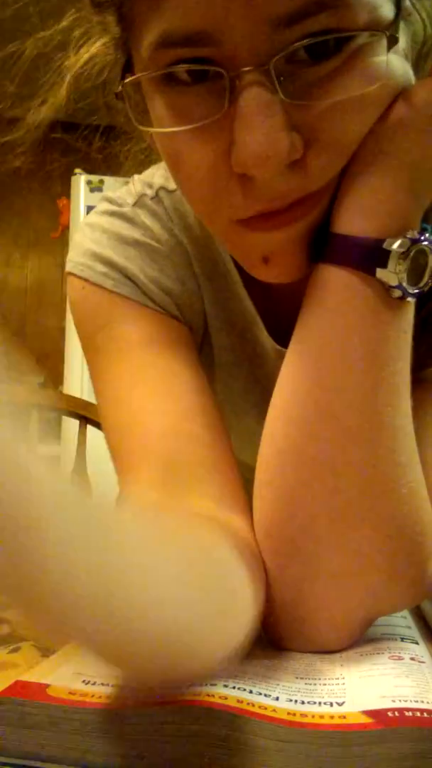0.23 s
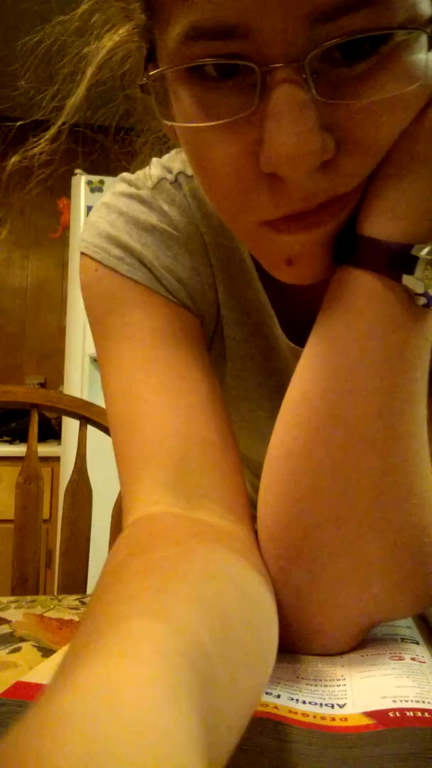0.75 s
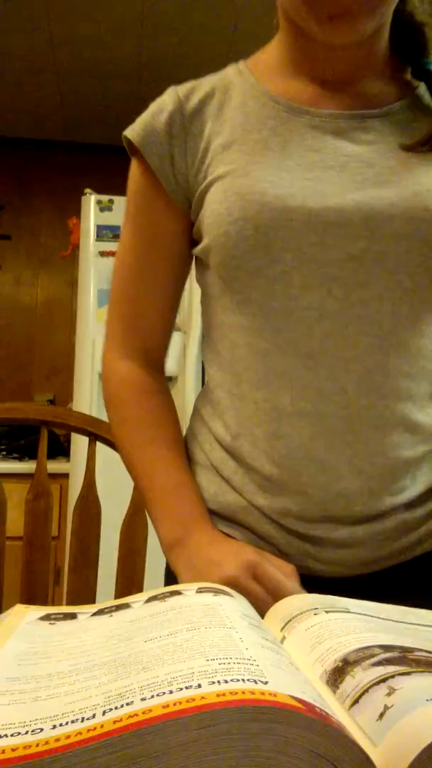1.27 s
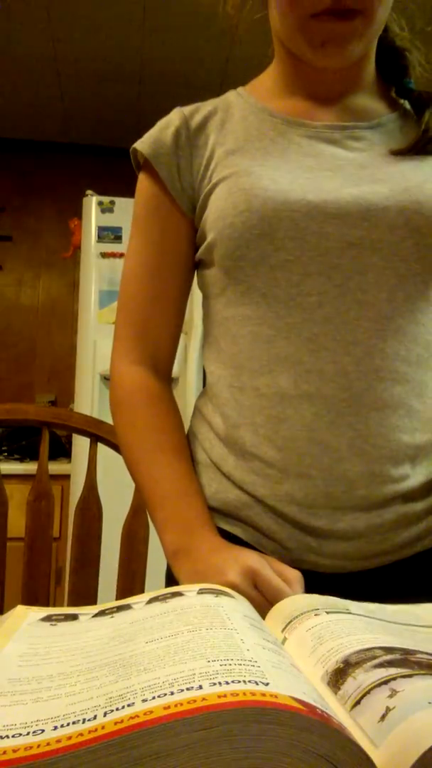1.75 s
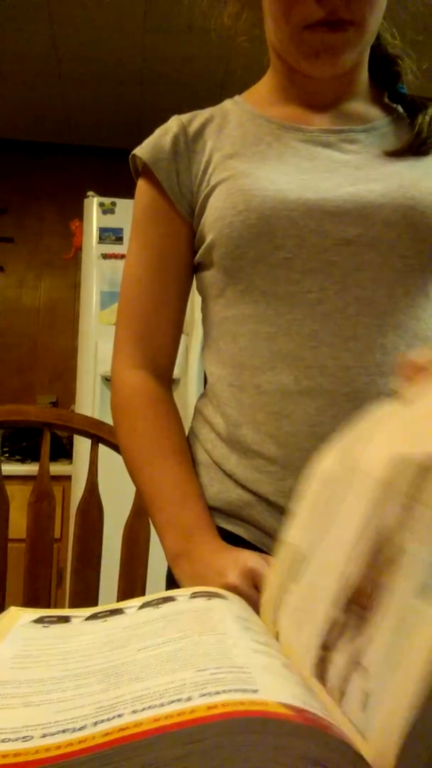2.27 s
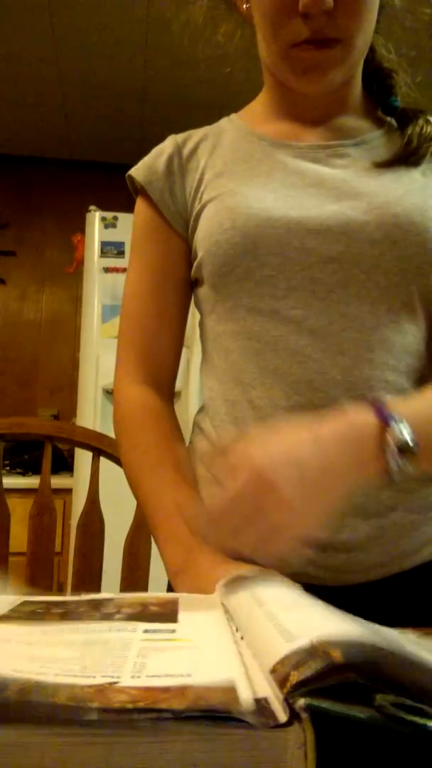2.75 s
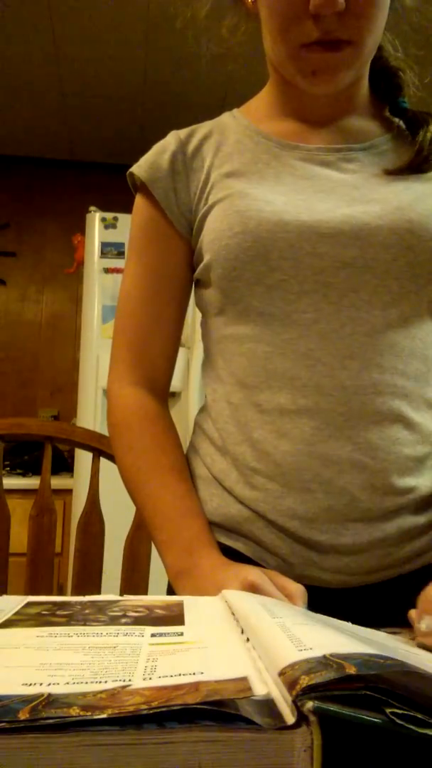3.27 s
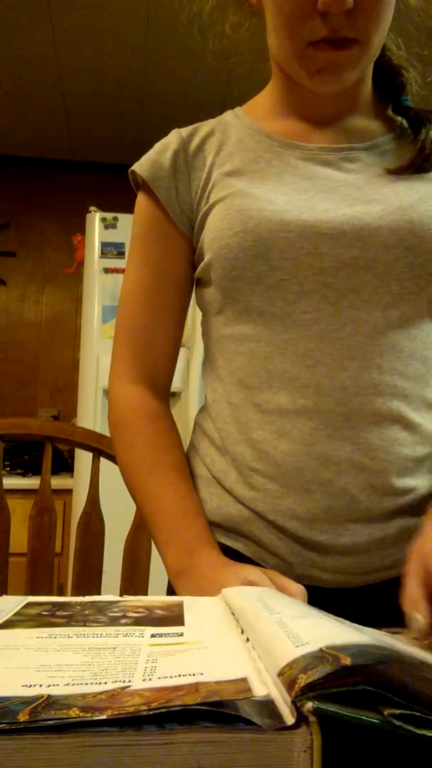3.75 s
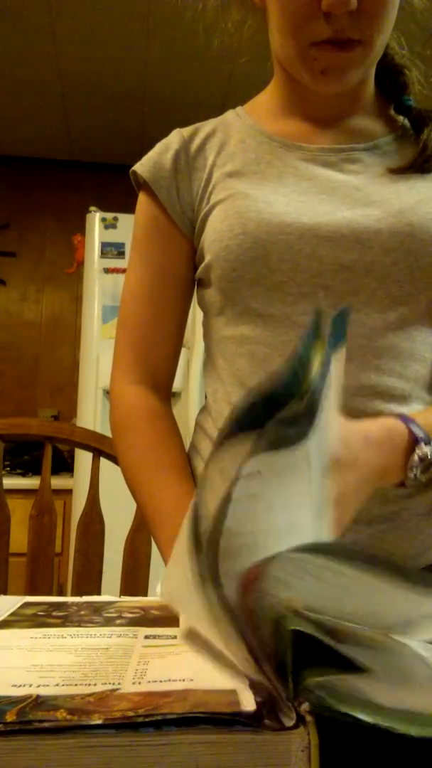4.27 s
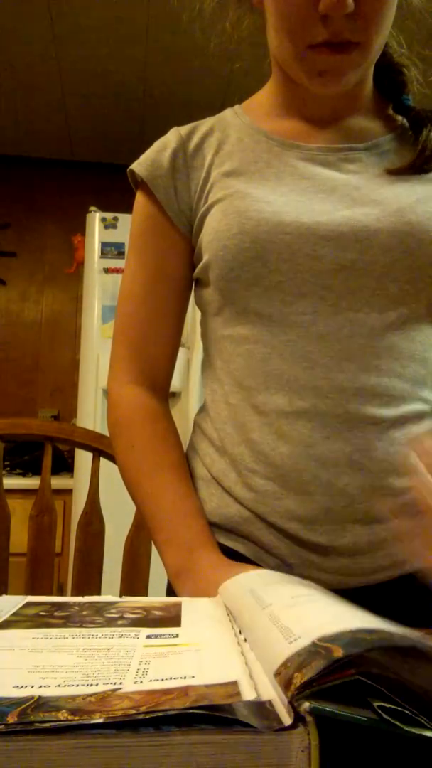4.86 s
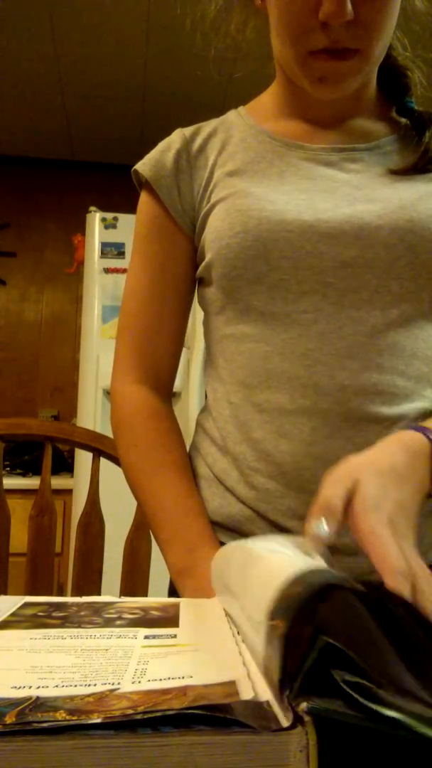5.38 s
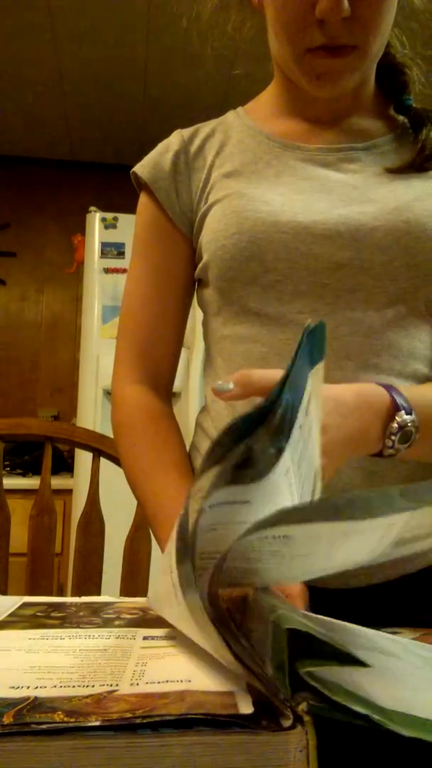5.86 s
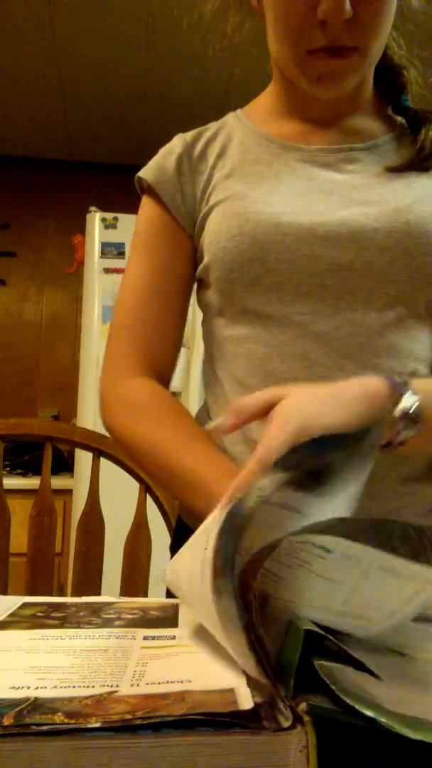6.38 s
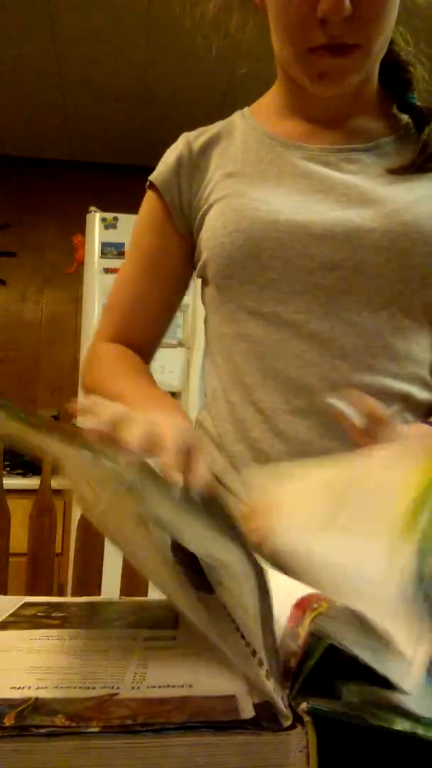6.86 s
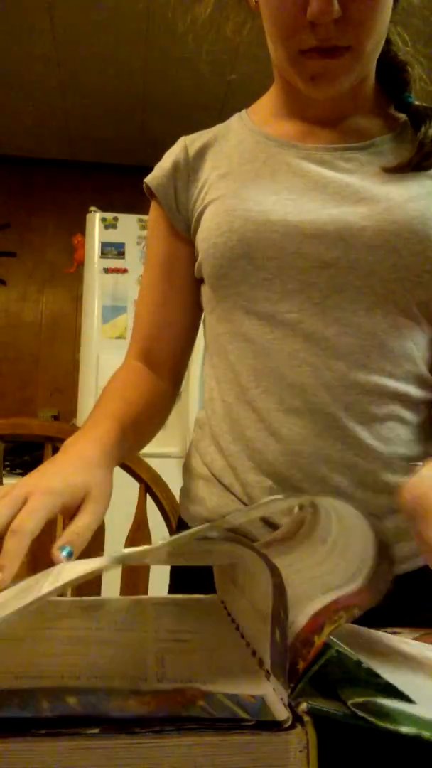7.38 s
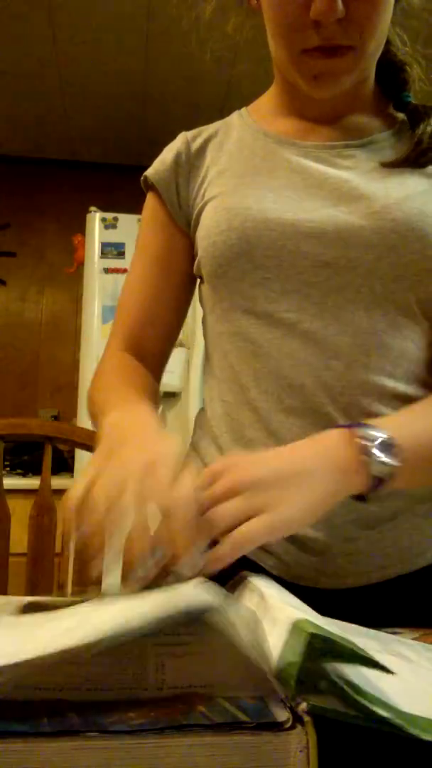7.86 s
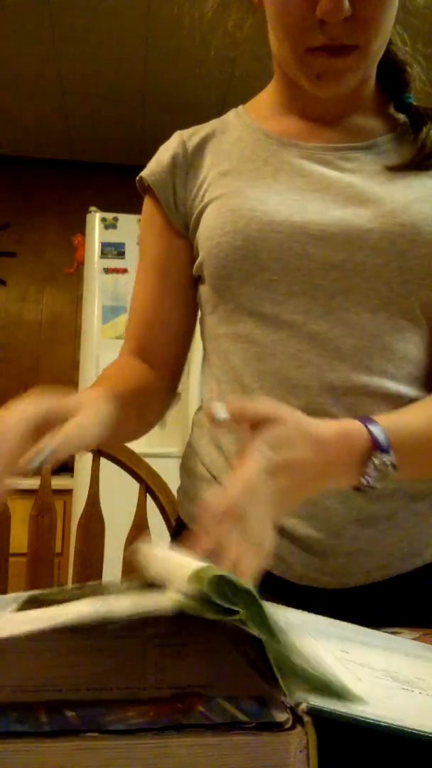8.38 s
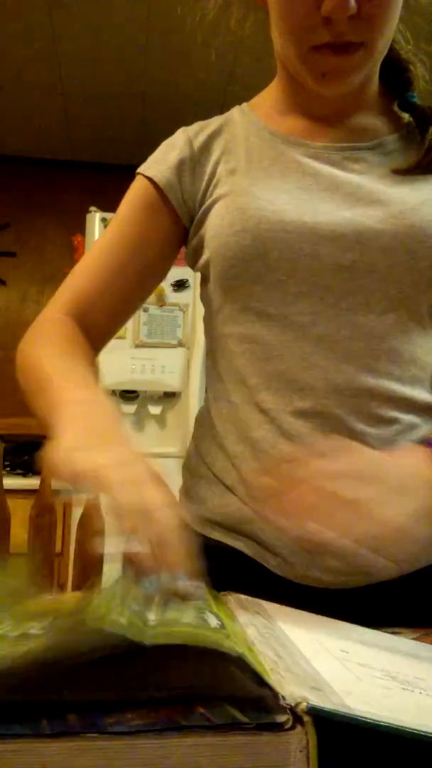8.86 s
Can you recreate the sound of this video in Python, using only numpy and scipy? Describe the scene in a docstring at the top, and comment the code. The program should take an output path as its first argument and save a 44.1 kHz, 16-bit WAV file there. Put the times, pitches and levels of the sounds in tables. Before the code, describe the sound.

A thick book is shifted on a table with light scrapes and taps, and a knock sets something hollow briefly ringing. A heavy block of pages slams down. Then wads of pages are flipped by hand in bursts, sliding, crinkling and snapping, and twice they land with a thud and a puff of air. The microphone is close, in a small room with faint rumble and hum.

```python
"""Wads of textbook pages are flipped in bursts on a kitchen table: sheets slide, buckle and snap, and
twice land with a thud and a puff of air. Before that, hands shift the book and knock something hollow
that rings, and a heavy block of pages slams down. A small room answers over faint rumble and hum;
a phone close by makes stereo from two ports."""
import sys
import numpy as np
from scipy import signal
from scipy.fft import rfft, irfft, next_fast_len
from scipy.io import wavfile
from scipy.ndimage import uniform_filter1d, map_coordinates

SR = 44100
rng = np.random.default_rng(int(sys.argv[2]) if len(sys.argv) > 2 else 0)


def waveform_to_disk(signal):
    """Save audio, clipped to [-1, 1], as 16-bit WAV at the path in sys.argv[1]."""
    frames = np.transpose(np.atleast_2d(signal))
    scaled = np.clip(frames, -1, 1) * 32767
    samples = np.round(scaled).astype(np.int16)
    wavfile.write(sys.argv[1], SR, samples)


N = 402543
T = np.arange(N) / SR
FFT_SIZE = next_fast_len(N + 4096)
FREQS = np.arange(FFT_SIZE // 2 + 1) * SR / FFT_SIZE
PORT_GAP_S = 16 / SR

# Spectrum of a snapping fold. Each row: frequency in Hz, level in dB.
FOLD_VOICE = [(60, -13.5), (200, -10.5), (450, -6), (900, -7), (1400, -6.5), (1750, 2.5), (2000, 7.5),
              (2350, -1.5), (2800, 2), (3700, -6.5), (4900, -7), (6300, -6.5), (8500, -21.5), (11000, -29),
              (13000, -27.5), (15000, -39)]
# Spectrum of the cover on the table. Each row: frequency in Hz, level in dB.
COVER_VOICE = [(60, -8), (250, -7), (400, 2), (580, 3.5), (900, -3.5), (1400, -9.5), (2000, -7.5),
               (3500, -23), (15000, -49)]


def amp(db):
    """Decibels to gain."""
    return 10 ** (np.asarray(db) / 20)


def unit(x):
    """Scale to rms 1."""
    return x / np.sqrt(np.mean(x ** 2))


def contour(points, hz):
    """Read (Hz, value) points on a log-frequency axis."""
    point_hz, values = np.transpose(points)
    return np.interp(np.log(hz + 1), np.log(point_hz), values)


def shape(x, gain):
    """Filter a full-length sound by a gain per frequency."""
    return irfft(rfft(x, FFT_SIZE) * gain, FFT_SIZE)[..., :N]


def colour(x, points, tilt_db=0, size=1024):
    """Minimum-phase filter through (Hz, dB) points, tilted by tilt_db per octave around 2 kHz."""
    hz = np.arange(size // 2 + 1) * SR / size
    octaves = np.log2(np.clip(hz, 250, 8000) / 2000)
    cepstrum = irfft(np.log(amp(contour(points, hz) + tilt_db * octaves)))
    cepstrum[1:size // 2] *= 2
    cepstrum[size // 2 + 1:] = 0
    return signal.fftconvolve(x, irfft(np.exp(rfft(cepstrum))))[:len(x)]


def whiten(x, size=1024):
    """Level the broad spectral humps of a short burst."""
    power = uniform_filter1d(abs(rfft(x, size)) ** 2, 9)
    hz = np.arange(len(power)) * SR / size + 1
    return colour(x, np.transpose([hz, -10 * np.log10(power + 1e-12)]))


def peak_rms(x):
    """Highest rms over 1.5 ms."""
    return np.sqrt(uniform_filter1d(x ** 2, 66).max())


def fade(t, t60_s):
    """Exponential decay."""
    return np.exp(-np.log(1000) * t / t60_s)


def add(track, start_s, sound):
    """Mix a sound in at a time."""
    i = max(int(start_s * SR), 0)
    track[i:i + len(sound)] += sound[:max(N - i, 0)]


def walk(rate_hz):
    """Smooth random drift, rms 1."""
    step = max(int(SR / rate_hz), 1)
    stairs = np.repeat(rng.standard_normal(N // step + 1), step)
    return unit(uniform_filter1d(stairs, step)[:N])


def ring(modes):
    """Impulse response of (Hz, dB, t60 s) modes with alternating signs."""
    t = T[:SR // 2]
    return sum((-1) ** k * amp(db) * np.sin(2 * np.pi * hz * t) * fade(t, t60_s)
               for k, (hz, db, t60_s) in enumerate(modes))


def cracks(events, voice, crack_ms, flutter_db, vary_db, soft_ms, strain_db=-30, size=8192):
    """Each event: a swell of strain, a broadband crack, then a fading flutter of smaller contacts."""
    # Bite, a top-treble shelf. Each row: frequency in Hz, share of the bite.
    bite_shelf = [(5000, 0), (9000, 1)]
    out, t = np.zeros(N), T[:size]
    hz, voice_db = np.transpose(voice)
    for start_s, db, t60_ms, tilt_db, bite_db in events:
        burst, contacts, flicker, variation, creak = rng.standard_normal((5, size))
        # a long flutter means a loose fold, which gives way more slowly
        crack_s = crack_ms / 1000 * (1 + (t60_ms / soft_ms) ** 2)
        crack = whiten(burst * fade(t, crack_s) * (1 - fade(t, crack_s)))
        crack /= peak_rms(crack)
        flutter = unit(contacts * amp(5.1 * flicker)) * fade(t, t60_ms / 1000)
        flutter *= 1 - fade(t, 2 * crack_s)
        # a tight fold goes without warning
        looseness = min(t60_ms / soft_ms / 2, 1) ** 2
        strain = (amp(strain_db) * looseness * creak * fade(t, 2 * crack_s))[size // 8::-1]
        fold_hz = hz * np.exp(.07 * variation[-1])  # a larger fold sounds lower
        fold_db = voice_db + bite_db * contour(bite_shelf, hz) + vary_db * variation[:len(hz)]
        drive = np.concatenate([strain, crack + amp(flutter_db) * flutter])
        sound = colour(drive, np.transpose([fold_hz, fold_db]), tilt_db)
        add(out, start_s - len(strain) / SR, amp(db) * sound / peak_rms(sound))
    return out


def diffuse(pair):
    """Sound from all sides: the ports agree only at wavelengths longer than their gap."""
    size = pair.shape[1]
    coherence = np.sinc(2 * PORT_GAP_S * np.arange(size // 2 + 1) * SR / size)
    mid, side = irfft(rfft(pair) * np.sqrt([1 + coherence, 1 - coherence]), size)
    return np.array([mid + side, mid - side]) / 2


def ports(x, lag_ms, shade_hz, scatter_db=-20):
    """The phone shades its left port: bass bends round late, treble scatters in off moving pages."""
    bent = rfft(x, FFT_SIZE) / (1 + (FREQS / shade_hz) ** 2)
    paths = rng.standard_normal((2, SR // 100)) * fade(T[:SR // 100], 0.0031)
    near, far = (signal.oaconvolve(x, h / np.linalg.norm(h))[:N] for h in map(whiten, paths))
    turn = np.pi * walk(3)
    scatter = rfft(near * np.cos(turn) + far * np.sin(turn), FFT_SIZE)
    scatter *= amp(scatter_db) * FREQS ** 2 / (FREQS ** 2 + 3000 ** 2)
    delay = np.exp(-2j * np.pi * FREQS * lag_ms / 1000)
    left = irfft(delay * (bent + scatter), FFT_SIZE)
    return np.array([left[:N], x])


def background(air_db, hum_db):
    """Room rumble and hiss with a faint mains hum."""
    # Kitchen noise spectrum. Each row: frequency in Hz, level in dB.
    air_voice = [(22, -3.5), (60, -4), (200, -6), (370, -6.5), (700, -17), (1300, -21), (2500, -24.5),
                 (5000, -26), (9000, -27), (15000, -29)]
    air = unit(shape(diffuse(rng.standard_normal((2, N))), amp(contour(air_voice, FREQS))))
    hum = np.sin(2 * np.pi * 120 * T) * amp(1.5 * walk(4))
    return amp(air_db + .5 * walk(3.26)) * air + amp(hum_db) * hum


def wall_echoes(x, t60_s, build_s):
    """Reflections build up and die away at both ports."""
    # Echo spectrum. Each row: frequency in Hz, level in dB.
    wall_voice = [(60, 18), (250, 4.5), (1000, 3), (4000, 5), (8000, 2), (15000, 8)]
    t = T[:SR // 2]
    tails = diffuse(rng.standard_normal((2, len(t)))) * fade(t, t60_s) * (1 - fade(t, build_s)) ** 2
    tails = [colour(h, wall_voice) for h in tails]
    return np.array([signal.fftconvolve(x, h / np.linalg.norm(h))[:N] for h in tails])


def air_puffs(low_hz, high_hz):
    """Air pushed out by falling pages buffets each port separately."""
    # Each row: start in seconds, level in dB, t60 in seconds.
    gusts = [(2.05, -27, 0.38), (4.95, -51, 1), (5.86, -54, 1), (6.784, -31, 0.4), (7.435, -29.5, 0.31),
             (8.70, -42.5, 0.48)]
    envelope = sum(amp(db) * (T > start_s) * fade(abs(T - start_s), t60_s)
                   for start_s, db, t60_s in gusts)
    band = FREQS / np.hypot(FREQS, low_hz) / (1 + (FREQS / high_hz) ** 2)
    return unit(shape(rng.standard_normal((2, N)), band)) * uniform_filter1d(envelope, SR // 100)


def cover_drags(slips_per_s, hiss_db):
    """The cover catches and slips on the table in short pushes."""
    # Each row: start in seconds, length in seconds, level in dB.
    pushes = [(1.36, 0.048, -57.5), (1.447, 0.079, -54), (1.654, 0.12, -52.5), (4.859, 0.05, -35),
              (4.95, 0.09, -40.5), (8.944, .09, -66), (9.068, 0.055, -50.5)]
    envelope = np.zeros(N)
    for start_s, length_s, db in pushes:
        add(envelope, start_s, amp(db) * np.sqrt(np.hanning(int(length_s * SR))))
    slips = unit((rng.random(N) < slips_per_s / SR) * rng.choice([-1, 1], N))
    return envelope * unit(colour(slips + amp(hiss_db) * rng.standard_normal(N), COVER_VOICE))


def cover_taps():
    """The cover taps lightly as it is shifted."""
    # Each row: start in seconds, level in dB, flutter t60 in ms, tilt in dB per octave, bite in dB.
    taps = [(1.4275, -35.5, 40, -3, 1), (1.6045, -34, 20, 3.5, -6), (1.698, -40.5, 30, -2, 0),
            (1.712, -40.5, 25, -1, -2), (1.7773, -39.5, 27, 4, -2), (1.791, -37, 29, 4.5, -2),
            (1.814, -31.5, 25, 4, -7), (1.881, -38.5, 18, 0, -2), (4.687, -39.5, 20, 3, 3)]
    return cracks(taps, COVER_VOICE, crack_ms=4.4, flutter_db=-1.5, vary_db=5.5, soft_ms=52)


def table_knocks():
    """Soft blows ring the book and table; a longer contact is duller."""
    # Each row: start in seconds, level in dB, contact time in ms.
    blows = [(0.045, -31, 3.4), (1.808, -26, 3.2), (1.814, -19, 3.1), (3.139, -30, 0.19),
             (4.371, -24.5, 3.75), (4.422, -34, 1.6), (6.779, -27, 1.35), (6.792, -13.5, 1.4),
             (6.811, -30, 0.7), (7.43, -26, 1.1), (7.443, -11.5, 0.81), (7.464, -23, 0.49),
             (8.698, -35, 0.39), (9.076, -36, 0.54), (9.103, -32.5, 0.24)]
    # Book on the table. Each row: frequency in Hz, level in dB, t60 in seconds.
    modes = [(131, -8.5, 0.087), (245, -12, 0.091), (360, -13.5, 0.12), (454, -7.5, 0.078),
             (542, 5.5, 0.016), (579, 3, 0.038), (880, -12, 0.0053)]
    out, response = np.zeros(N), ring(modes)
    for start_s, db, contact_ms in blows:
        force = np.exp(-(4 * (T[:SR // 100] * 1000 / contact_ms - .5)) ** 2)
        add(out, start_s, amp(db) * signal.fftconvolve(response, force / force.sum()))
    return out


def hollow_ring(start_s, db):
    """Something hollow on the table is nudged and rings on."""
    # Each row: frequency in Hz, level in dB, t60 in seconds.
    modes = [(364, -6.5, 0.61), (464, -17.5, 0.53), (253, -17.5, 0.95), (220, -5.5, 0.12), (318, 0.5, 0.06),
             (598, -35, 0.51)]
    out = np.zeros(N)
    add(out, start_s, amp(db) * ring(modes))
    return out


def table_thump():
    """The table gives a short low ring under each blow of the block."""
    # Each row: start in seconds, level in dB.
    blows = [(2.035, -5), (2.0514, -9), (2.0688, -3.5)]
    # Each row: frequency in Hz, level in dB, t60 in seconds.
    modes = [(368, -0.5, 0.02), (242, -8.5, .028), (292, -6, .028)]
    out = np.zeros(N)
    for start_s, db in blows:
        add(out, start_s, amp(db) * ring(modes))
    return out


def block_slam():
    """A heavy block of pages lands edge first with a click, then flat."""
    # Each row: start in seconds, level in dB, clatter t60 in ms, tilt in dB per octave, bite in dB.
    landings = [(2.0322, -14, 9.3, -4.5, -4), (2.0503, -3.5, 32, -4.5, -15), (2.0555, -12, 50, 1.5, -10),
                (2.0675, -7.5, 59, 1, 1), (2.0757, -15, 45, 2.5, -6), (2.083, -24, 234, 4.5, -4),
                (2.178, -29.5, 30, -0.5, 0)]
    edge_click = [(2.0345, -12, 4.5, 2.1, 4.9)]
    # Spectrum of the block. Each row: frequency in Hz, level in dB.
    block_voice = [(50, -10.5), (95, -1.5), (145, 0), (190, -8.5), (245, 3.5), (310, 0), (420, -8),
                   (560, -1.5), (900, -8), (1300, -17.5), (1900, -9.5), (2700, -15.5), (4000, -22),
                   (6500, -28.5), (10000, -43.5), (15000, -50)]
    clatter = cracks(landings, block_voice, crack_ms=4.2, flutter_db=6.5, vary_db=3.0, soft_ms=75)
    click = cracks(edge_click, block_voice, crack_ms=2.3, flutter_db=-16, vary_db=-1.5, soft_ms=80)
    return clatter + click


def strokes(glide_t60_s, dull_db_per_s):
    """Sheets speed up, hold and glide to rest, treble fading first; gives level, treble, body in dB."""
    # Paper sliding on paper and skin. Each row: start, rise and hold in seconds,
    # then level, treble and body of the wad in dB.
    slides = [ (1.354, .012, .12, -54, -26, 0.5), (1.603, .01, .03, -47, -2, 1),
              (1.689, .06, .05, -56, -3, 6.5), (1.878, .015, .02, -43, 1.5, 0.5),
              (2.95, .04, .08, -56, 1, -1), (3.079, .2, .08, -52, 0, 1.5),
              (3.365, .015, .12, -38.5, -1.5, 3.5), (3.499, .025, .1, -29.5, -8.5, 0),
              (3.633, .03, .02, -43, 16, 0), (3.725, .04, .055, -39.5, 3.5, 1.5),
              (3.846, .01, .02, -35.5, -7.5, -2), (3.935, .01, .025, -43, -4, -0.5),
              (4.548, .09, .18, -50.5, 0, 3), (4.82, .13, .045, -35, -0.5, 2.5),
              (5.042, .025, .035, -39.5, -5.5, 0.5), (5.121, .03, .05, -46, -1.5, 3),
              (5.199, .05, .13, -57, -3, -0.5), (5.553, .015, .13, -42.5, -10.5, -2),
              (5.69, .08, .055, -39.5, -1, 1.5), (5.832, .008, .025, -32, -2, 1.5),
              (5.882, .02, .17, -42, -7, 0), (6.078, 0.029, .035, -34, -5.5, -1.5),
              (6.156, .015, .04, -30, -4, -3), (6.26, .04, .055, -31.5, -13, 0),
              (6.372, .03, .07, -39.5, -6, 4.5), (6.531, .04, .035, -33, -17, -1.5),
              (6.747, .02, .08, -54, -6.5, -1), (6.901, .018, .04, -27.5, -7, -0.5),
              (7.021, .014, .026, -30.5, -14, -0.5), (7.078, .02, .04, -44, -30, -6),
              (7.21, .05, .025, -35, -15, -1.5), (7.525, .025, .1, -36.5, -2, -1),
              (7.663, .014, .03, -32, 1.5, -1), (7.73, .025, .07, -39.5, -6.5, -2.5),
              (7.933, .035, .025, -39, -1, 0.5), (8.049, .02, .02, -44, -3.5, 3),
              (8.178, .06, .05, -40.5, -4, 4.5), (8.367, .006, .012, -38, 6, 2),
              (8.932, .025, .04, -53, 2.5, 1), (9.063, .04, .03, -53, -8, -4)]
    power, treble, body = np.full(N, 1e-12), np.zeros(N), np.zeros(N)
    t = T[:SR]
    for start_s, rise_s, hold_s, db, treble_db, body_db in slides:
        gliding_s = np.maximum(t - rise_s - hold_s, 0)
        stroke = (amp(db) * np.minimum(t / rise_s, 1) * fade(gliding_s, glide_t60_s)) ** 2
        add(power, start_s, stroke)
        add(treble, start_s, stroke * (treble_db - dull_db_per_s * gliding_s))
        add(body, start_s, stroke * body_db)
    return 10 * np.log10(power), treble / power, body / power


def sheet_rustle(level_db, treble_db, body_db, grains_per_s, spread_db, hiss_db, uneven_db, bend_db):
    """Fibres catch and let go in tiny clicks over a hiss; resonances come and go as the sheet bends."""
    # Spectrum of a sheet. Each row: frequency in Hz, level in dB.
    sheet_voice = [(25, -25), (60, -10), (200, -8), (450, -6.5), (900, -7), (1400, -4), (1750, -0.5),
                   (2000, 4), (2350, -2), (2800, 3.5), (3700, -5.5), (4900, -9), (6300, -7), (8500, -19.5),
                   (15000, -32)]
    sizes = amp(spread_db * np.minimum(rng.exponential(size=N), 4))
    grains = (rng.random(N) < grains_per_s / SR) * sizes * rng.choice([-1, 1], N)
    friction = unit(colour(unit(grains) + amp(hiss_db) * rng.standard_normal(N), sheet_voice))
    # resonances wander as the free part of the sheet changes size
    remainder = map_coordinates(friction, [np.cumsum(1 + .1 * walk(9))], mode="mirror")
    # strokes lighter than a firm one have more hollow scrape and fine sizzle
    lightness_db = -34 - level_db
    scrape, sizzle = amp(0.5234 * lightness_db), amp(3.5 + 0.1692 * lightness_db)
    treble, body = amp(treble_db), amp(body_db)
    bands = [(50, 0.037), (700, scrape * body), (1200, 1.2 * body), (1750, 0.73 * np.sqrt(body)),
             (2900, 0.46), (4800, treble), (8300, treble)]
    rub = np.zeros(N)
    for top_hz, gain in bands:
        band = signal.sosfiltfilt(signal.butter(4, top_hz, fs=SR, output="sos"), remainder)
        rub += band * gain * amp(bend_db * walk(30))
        remainder -= band
    rub = (rub + remainder * treble * sizzle) / np.sqrt((1 + treble ** 2) / 2)
    return rub * amp(level_db + uneven_db * walk(90))


def sheet_crinkles(level_db, treble_db, count):
    """Small folds give way at random: more often in strong strokes, brighter in bright ones."""
    odds = np.cumsum(amp(.4 * level_db))
    at = np.searchsorted(odds, odds[-1] * (np.arange(count) + rng.random(count)) / count)
    size, length, brightness = rng.standard_normal((count, 3)).T
    peak_db = level_db[at] + 1.5 + size
    t60_ms = 17 * amp(3.5 * length)
    tilt_db = 0.5 + 0.21 * treble_db[at] + 3 * brightness
    bite_db = np.full(count, -3.5)
    folds = np.transpose([T[at], peak_db, t60_ms, tilt_db, bite_db])
    return cracks(folds, FOLD_VOICE, crack_ms=2.2, flutter_db=-6, vary_db=2.5, soft_ms=39, size=2048)


def stiff_leaf_flicks():
    """A stiff leaf flicks with short, bright snaps."""
    # Each row: start in seconds, level in dB, flutter t60 in ms, tilt in dB per octave, bite in dB.
    flicks = [(7.677, -26.5, 140, 0, -2), (8.3723, -17.5, 18, -3, -4), (8.3755, -16.5, 31, 1, -2)]
    # Spectrum of the leaf. Each row: frequency in Hz, level in dB.
    leaf_voice = [(300, -24), (1100, -5), (2000, -7), (3000, 4), (4000, 4.5), (4900, -3.5), (7000, -7),
                  (9500, -20.5), (15000, -35)]
    return cracks(flicks, leaf_voice, crack_ms=2.3, flutter_db=-16, vary_db=6.0, soft_ms=99)


def sheet_pops(attack_s):
    """A taut sheet pops through and briefly rings its main resonance."""
    # Each row: start in seconds, level in dB, pitch in Hz, t60 in ms.
    pops = [(4.208, -39.5, 1930, 17), (5.0418, -17.5, 1690, 17), (5.5516, -19.5, 1895, 18),
            (5.962, -14, 1910, 23), (7.1861, -16.5, 1730, 11), (7.378, -35.5, 1750, 21),
            (8.7535, -33, 1870, 12)]
    out, attack = np.zeros(N), 1 - fade(T[:SR // 2], attack_s)
    for start_s, db, hz, t60_ms in pops:
        add(out, start_s, ring([(hz, db, t60_ms / 1000)]) * attack)
    return out


def sheet_snaps():
    """Sheets buckle and spring straight."""
    # Each row: start in seconds, level in dB, flutter t60 in ms, tilt in dB per octave, bite in dB.
    folds = [(1.3545, -37, 43, -4.5, -13), (1.371, -42, 29, -4.5, -6), (1.5107, -36, 16, 4, -8.5),
             (1.6072, -27, 9.2, 5.5, 2.5), (1.8901, -30.5, 20, 3.5, -4), (1.907, -38, 14, 3, -1),
             (3.3238, -31, 54, -1, 5), (3.3677, -28, 28, -5.5, 12), (3.3772, -16.5, 16, 2.5, 2),
             (3.3991, -22, 29, 1.5, -2), (3.446, -27, 30, -2, -3), (3.5018, -17, 27, 2.5, 1),
             (3.52, -21, 67, -3.5, 0), (3.5441, -16, 13, 4, 4), (3.5522, -14, 26, 6.5, 2),
             (3.5832, -13.5, 25, 0.5, 3), (3.5996, -22, 33, 2, 5), (3.6055, -20, 18, -0.5, 0),
             (3.616, -33, 20, -3, 0), (3.743, -31, 52, 1.5, 3), (3.8484, -23, 60, 1.5, -2),
             (3.9375, -26.5, 48, 1, 4), (4.1815, -39.5, 24.5, 6, -10), (4.4225, -40.5, 41, -5.5, 11),
             (4.5765, -40, 41, -4.5, -3), (4.828, -33, 31, -3, 10), (4.8546, -27, 35, -3, 3),
             (4.8975, -25.5, 54, -1.5, 5), (4.901, -19.5, 6.8, 3.5, 1), (4.938, -26, 35, -4.5, 2),
             (4.9613, -26.5, 65, -4.5, 3), (4.98, -28.5, 79, -3, 6), (5.0422, -18.5, 28, -0.5, 9),
             (5.0604, -21.5, 53, 0.5, 1), (5.0815, -24.5, 12, -2.5, -7), (5.1216, -27, 28, -2, 5),
             (5.4077, -39.5, 26, -1, 6), (5.5512, -28, 20, -1.5, -8), (5.6391, -36.5, 14, -5.5, -4),
             (5.6698, -28, 25, -2, 2), (5.7243, -27, 24, -3, 1), (5.743, -30, 25, 3, -4),
             (5.8275, -20, 21, 2, 0), (5.8412, -11.5, 22, 0.5, 8), (5.9627, -13.5, 18, 2, 2),
             (6.053, -32, 20, -2.5, 0), (6.1, -17.5, 19, 2, 0), (6.1149, -20.5, 62, 3, -14),
             (6.1615, -18.5, 44, 4.5, -2), (6.166, -14.5, 57, 2.5, -13), (6.2015, -26.5, 40, 6, 7),
             (6.2845, -22, 56, 2, -17), (6.309, -29.5, 32, -5, -8), (6.321, -20.5, 48, 0.5, -13),
             (6.3453, -25, 51, -2.5, -2), (6.3812, -26, 40, 3.5, -1), (6.4021, -27.5, 33, 9, -2),
             (6.4321, -27.5, 51, 3, -7), (6.494, -30.5, 29, 2, -5), (6.5268, -12, 18.5, 3, 3),
             (6.57, -23, 32, -3, 9), (6.5777, -27, 30, -1, -4), (6.612, -38, 27, -1, -7),
             (6.6386, -26, 32, 4, -9), (6.762, -36.5, 45, -5, 7), (6.9095, -21.5, 42, 5, -7),
             (6.935, -33, 14, 11, -8), (6.9415, -18.5, 10, 9, -16), (6.952, -26, 25, 0, -6),
             (7.0316, -19.5, 58, -2, -4), (7.052, -23, 30, 0.5, -5), (7.1005, -37, 14, -2, -2),
             (7.1865, -17.5, 14, 1.5, 7), (7.2564, -29.5, 59, -5.5, -2), (7.271, -29.5, 47, -5, -2),
             (7.4324, -37.5, 40, 1.5, -6), (7.5405, -24.5, 63, 1.5, -2), (7.56, -26, 55, -3, -6),
             (7.6, -33, 30, 4, 0), (7.6779, -23, 106, -1.5, 4), (7.7572, -24, 28, -1, -5),
             (7.8481, -28.5, 60, -3.5, 1), (7.919, -33, 48, -4, 3), (7.9684, -26.5, 45, -0.5, -2),
             (7.986, -30, 28, -2, -9), (8.067, -34, 19, -2, -7), (8.076, -33, 25, 1, -11),
             (8.21, -33.5, 45, -2, -2), (8.258, -30, 37, -3.5, 8), (8.2834, -23, 34, -1.5, -4),
             (8.3613, -27.5, 31, 0.5, 5), (8.3723, -17.5, 9.4, 1, -3)]
    return cracks(folds, FOLD_VOICE, crack_ms=3.47, flutter_db=0.5, vary_db=2.0, soft_ms=29.8,
                  strain_db=-9.5)


def scene():
    """Paper, book and table in the kitchen, at the two ports."""
    level_db, treble_db, body_db = strokes(glide_t60_s=.32, dull_db_per_s=53)
    snaps = amp(-0.5) * sheet_snaps() + sheet_pops(attack_s=0.0014)
    snaps += sheet_crinkles(level_db, treble_db, count=170) + stiff_leaf_flicks()
    rustle = amp(-1.0) * sheet_rustle(level_db, treble_db, body_db, grains_per_s=450, spread_db=2.5,
                                      hiss_db=-0.5, uneven_db=2.5, bend_db=2.0)
    slam = block_slam()
    thuds = table_knocks() + cover_drags(slips_per_s=350, hiss_db=-1.5) + cover_taps()
    low_rings = hollow_ring(start_s=1.809, db=-17.5) + table_thump()
    direct = ports(snaps, lag_ms=0.083, shade_hz=1090, scatter_db=1.0)
    direct += ports(rustle, lag_ms=0.073, shade_hz=1270, scatter_db=4.5)
    direct += ports(thuds, lag_ms=0.16, shade_hz=2600)
    # these two shake the phone through the table and reach mainly one port
    direct += ports(slam, lag_ms=0.091, shade_hz=206, scatter_db=1.0)
    direct += ports(low_rings, lag_ms=0.12, shade_hz=146)
    to_walls = amp(-6.0) * (snaps + rustle) + amp(-12.0) * slam + amp(-6.5) * thuds
    echoes = wall_echoes(to_walls, t60_s=0.33, build_s=0.023)
    return direct + echoes + air_puffs(low_hz=32, high_hz=160) + background(air_db=-54.5, hum_db=-55.5)


def record(dry):
    """Each channel subtracts the other port, delayed, to aim sideways; peaks are rounded, the top cut."""
    # Each row: frequency in Hz, level of the subtracted port in dB.
    aiming = [(30, -3.5), (200, -0.5), (2700, -2.0), (5500, -12.0), (8500, -14.0)]
    delay = np.exp(-2j * np.pi * FREQS * PORT_GAP_S)
    aimed = dry - shape(dry[::-1], amp(contour(aiming, FREQS)) * delay)
    aimed *= amp([[-.6], [0]])  # left slightly weaker
    rounded = aimed / (1 + (aimed / .9) ** 4) ** .25
    return signal.sosfilt(signal.ellip(8, .2, 70, 15500, fs=SR, output="sos"), rounded)


dry = scene()
out = record(dry)
waveform_to_disk(out)
```